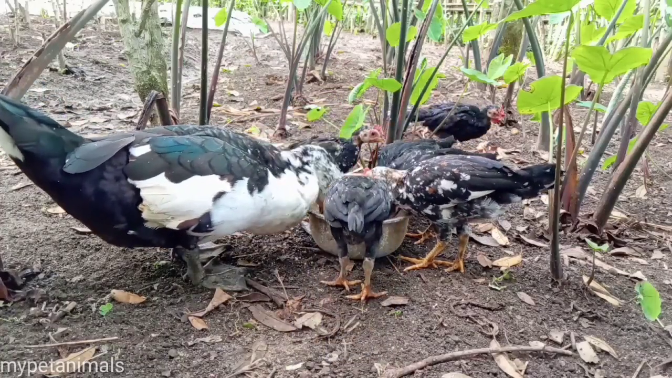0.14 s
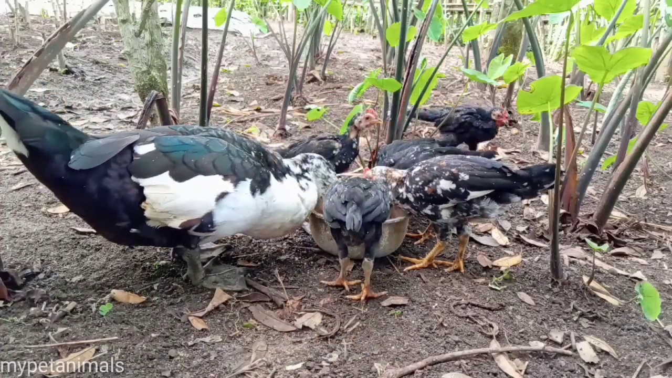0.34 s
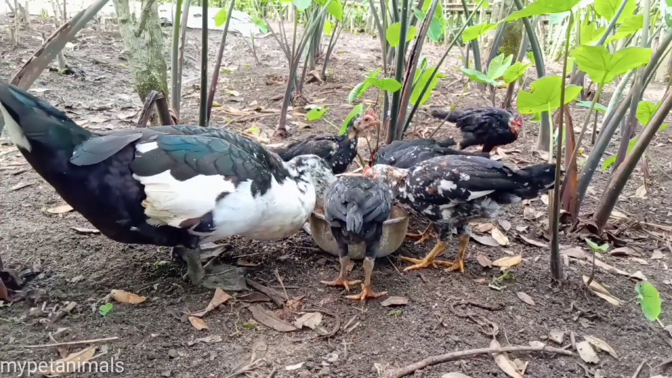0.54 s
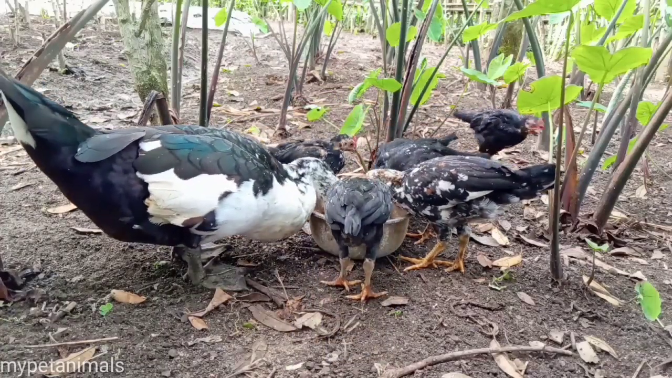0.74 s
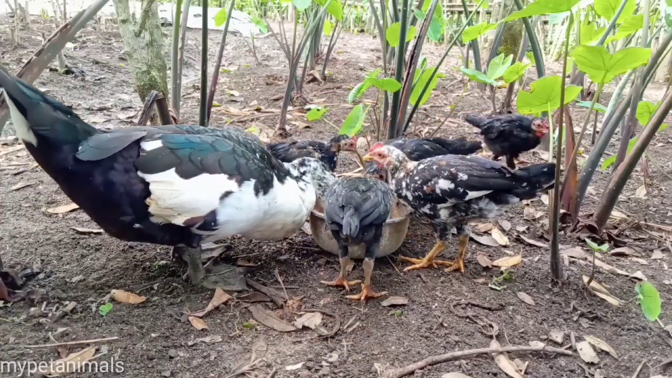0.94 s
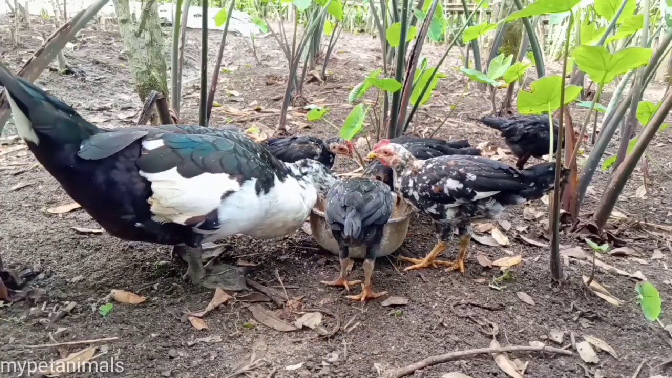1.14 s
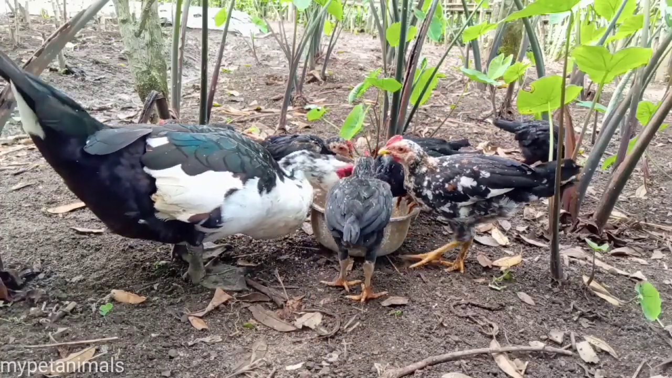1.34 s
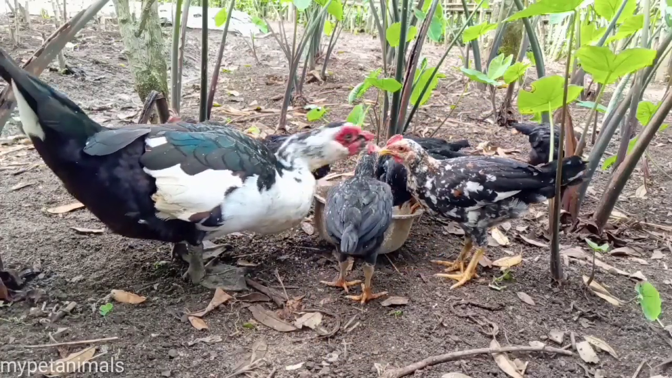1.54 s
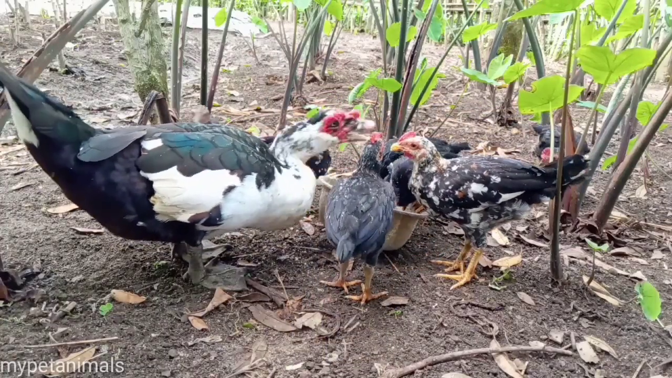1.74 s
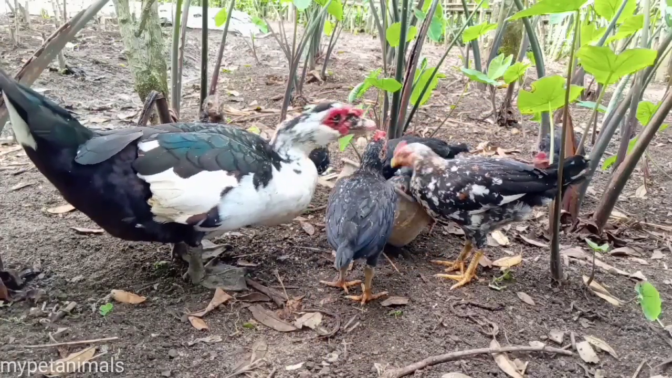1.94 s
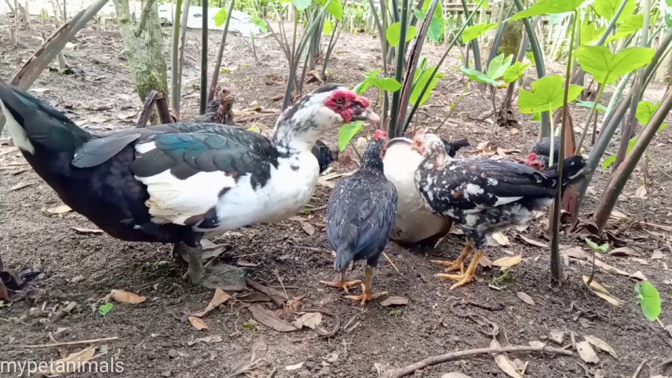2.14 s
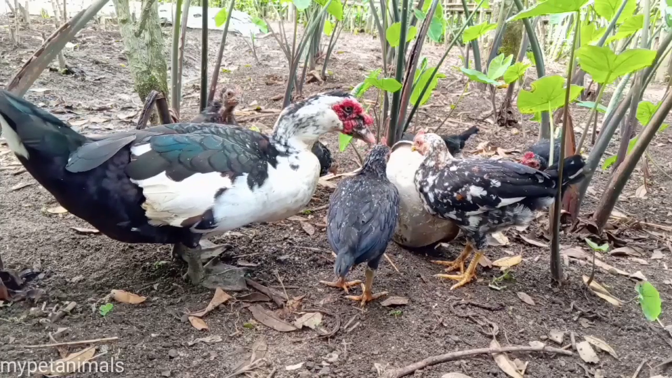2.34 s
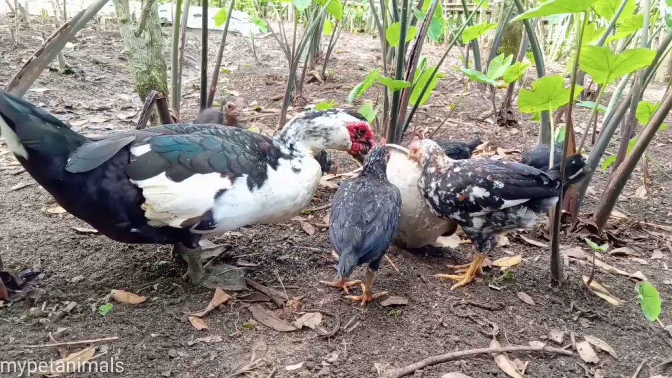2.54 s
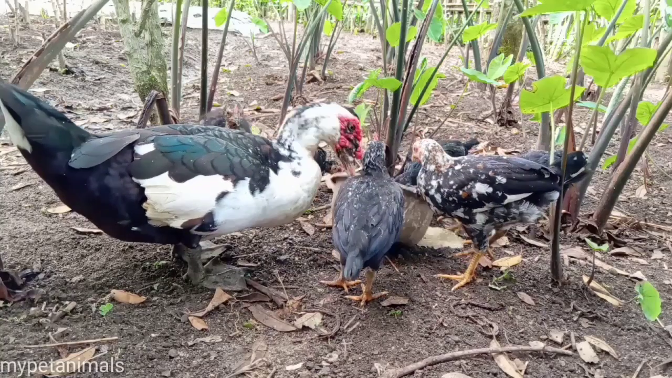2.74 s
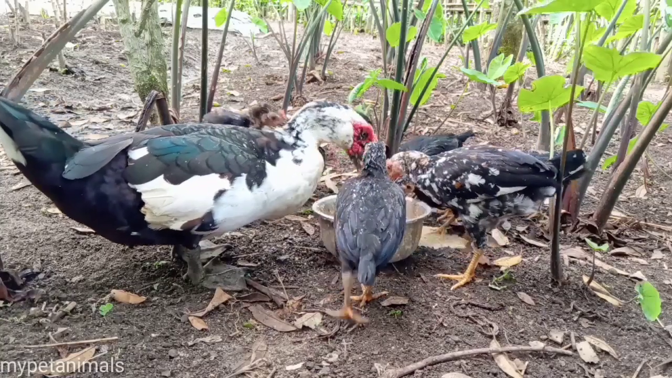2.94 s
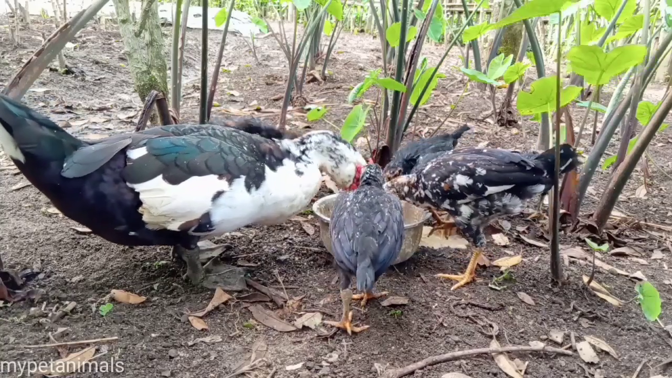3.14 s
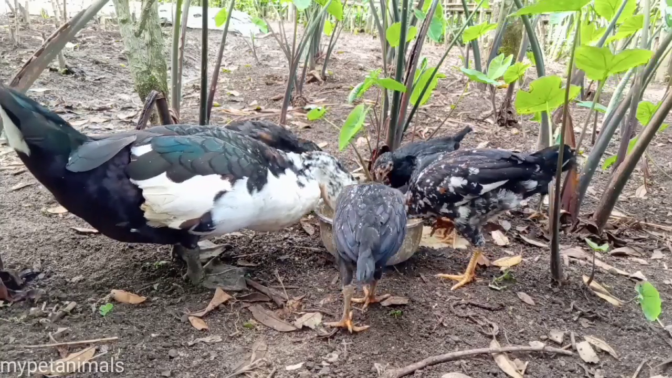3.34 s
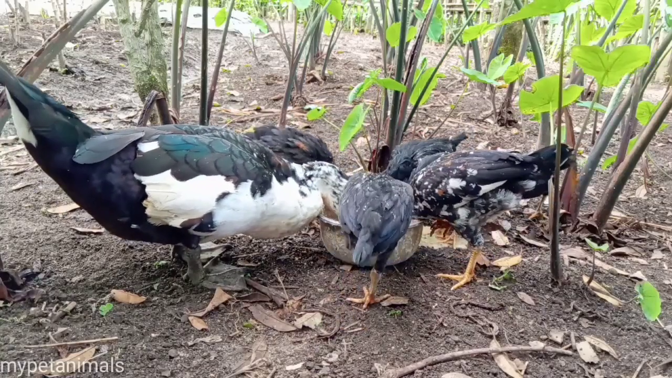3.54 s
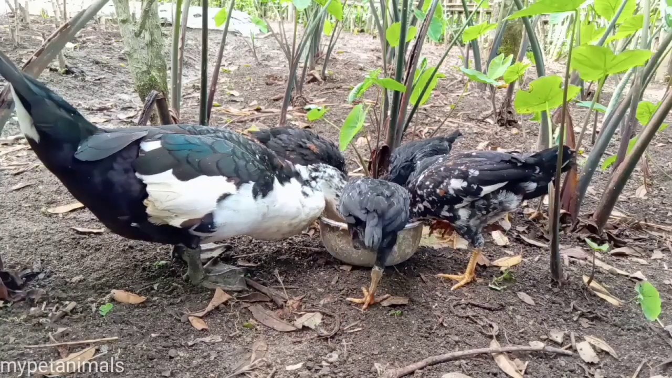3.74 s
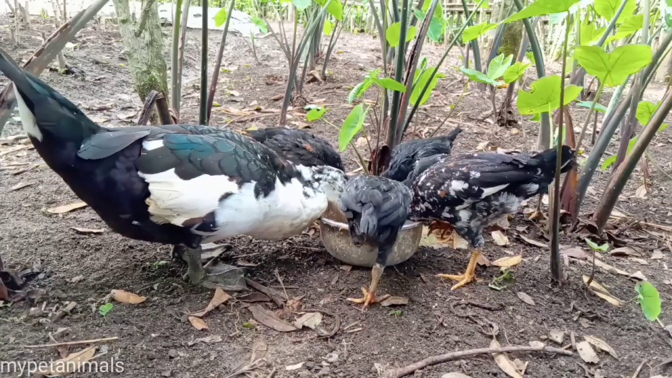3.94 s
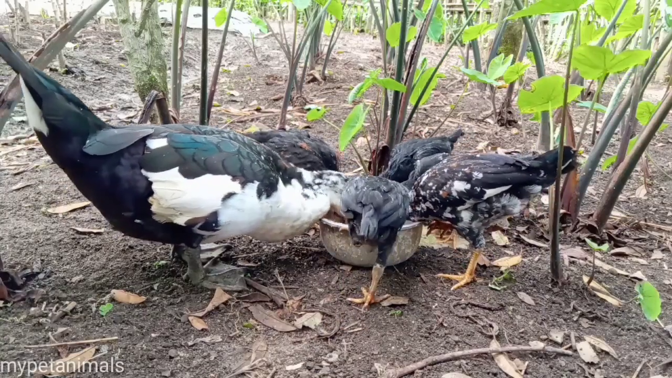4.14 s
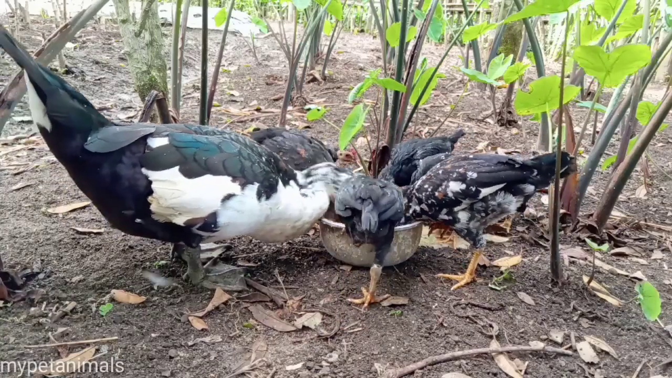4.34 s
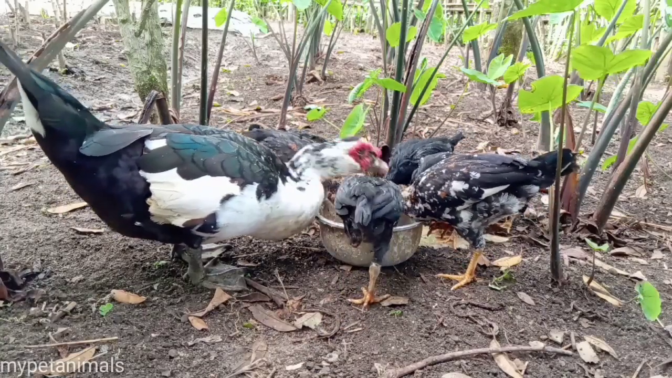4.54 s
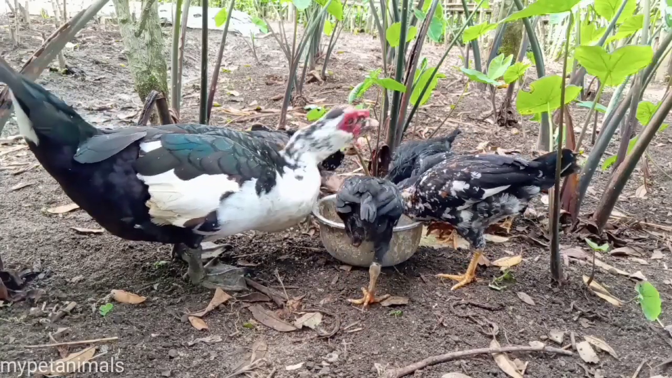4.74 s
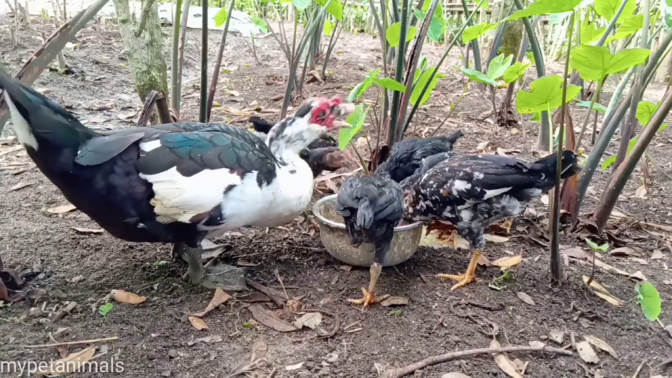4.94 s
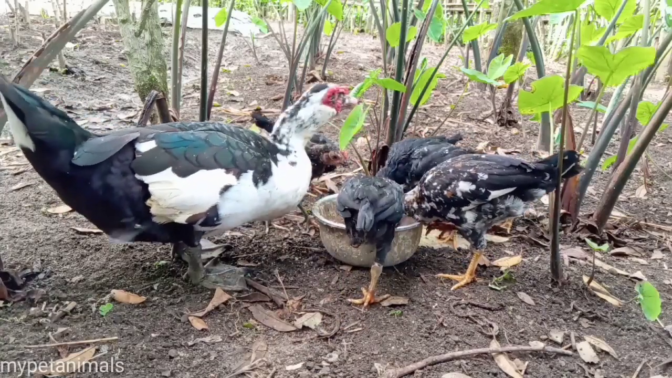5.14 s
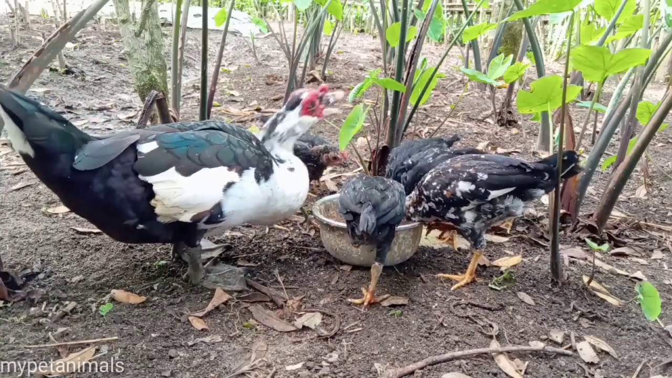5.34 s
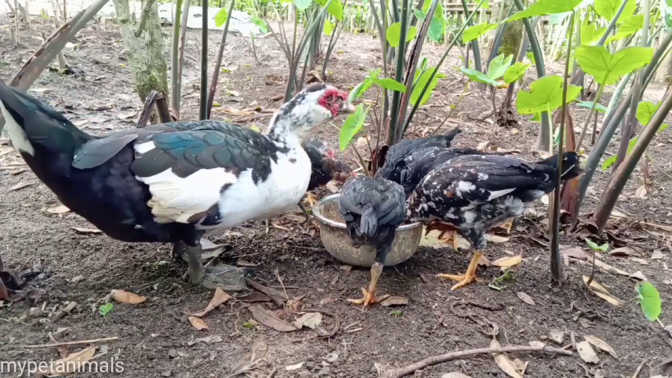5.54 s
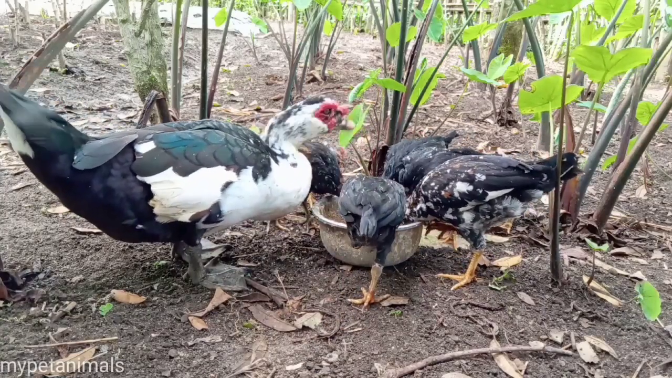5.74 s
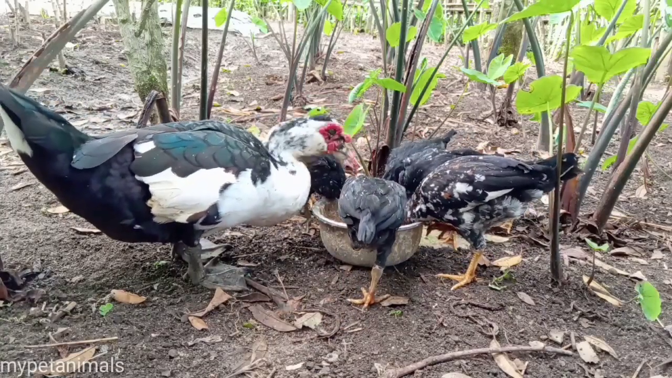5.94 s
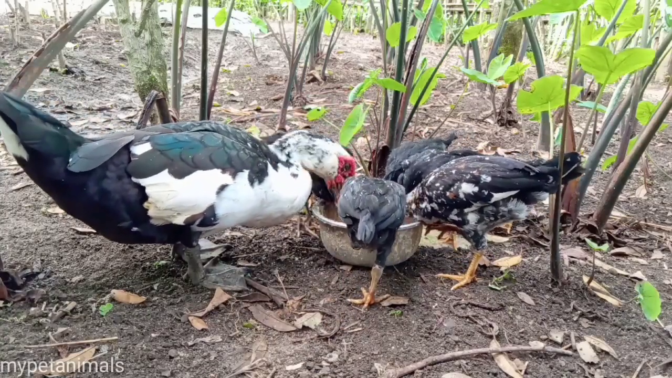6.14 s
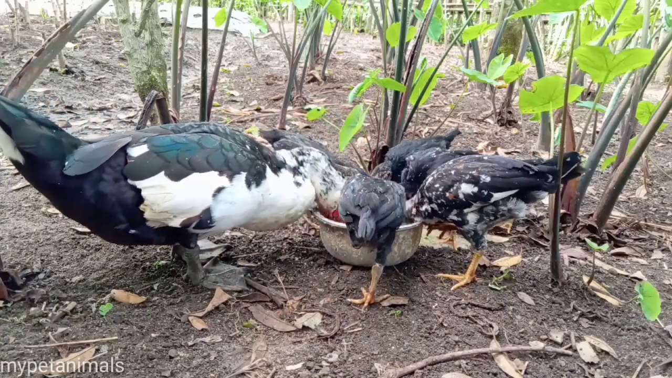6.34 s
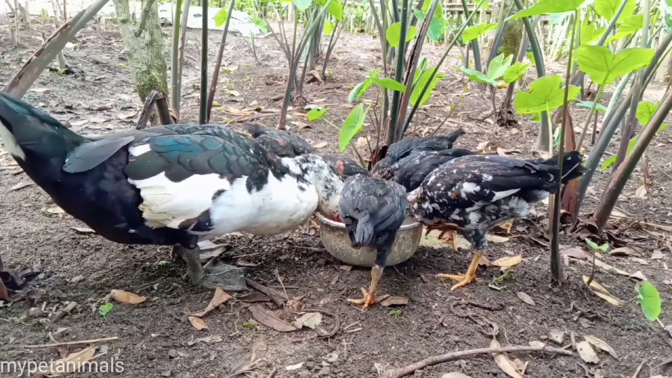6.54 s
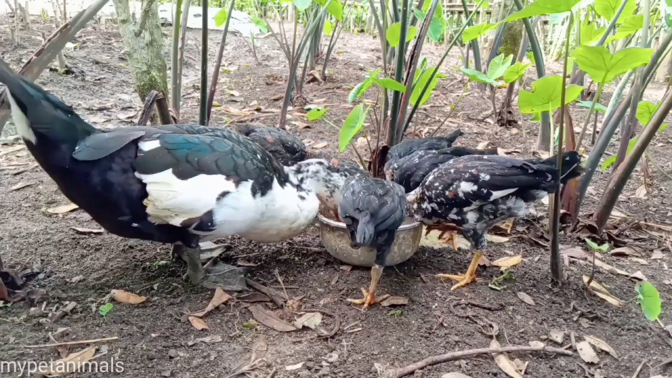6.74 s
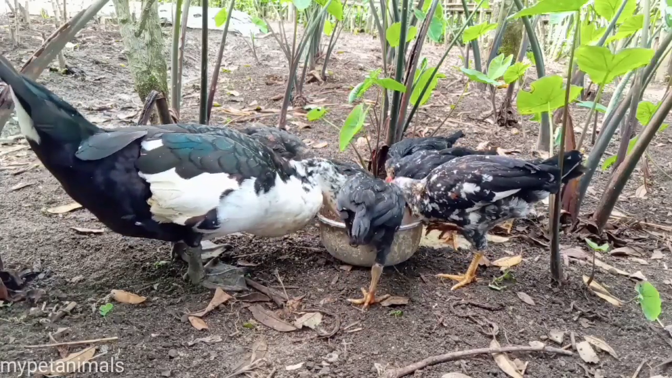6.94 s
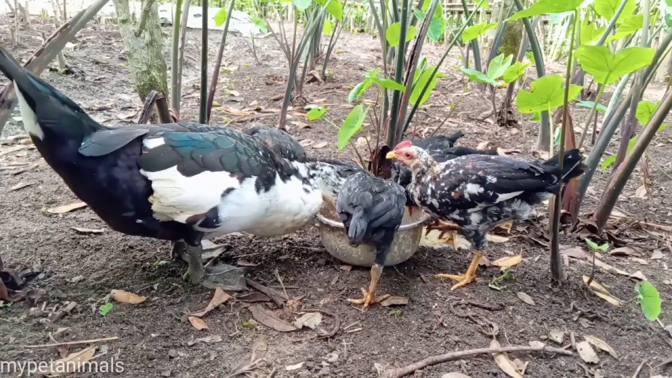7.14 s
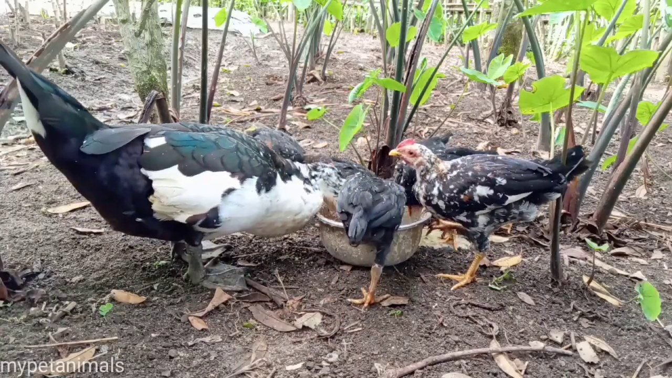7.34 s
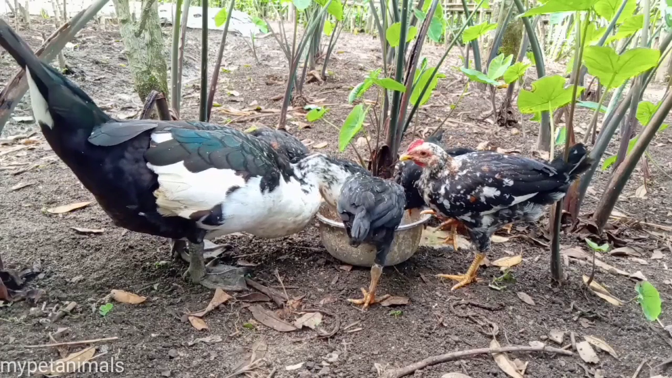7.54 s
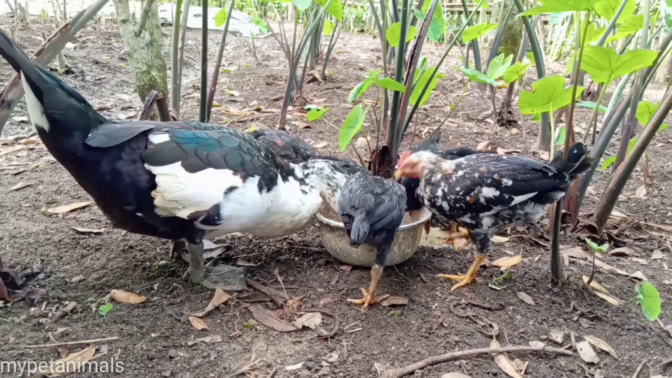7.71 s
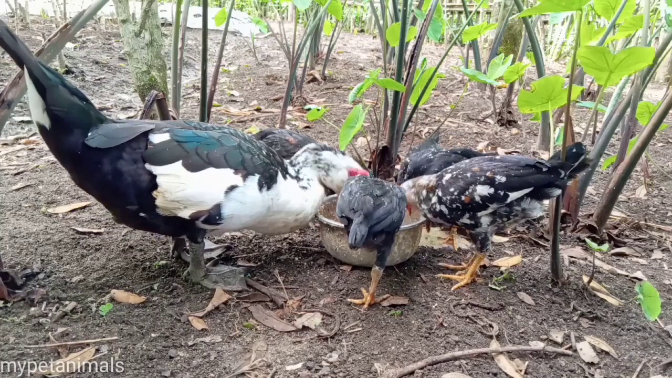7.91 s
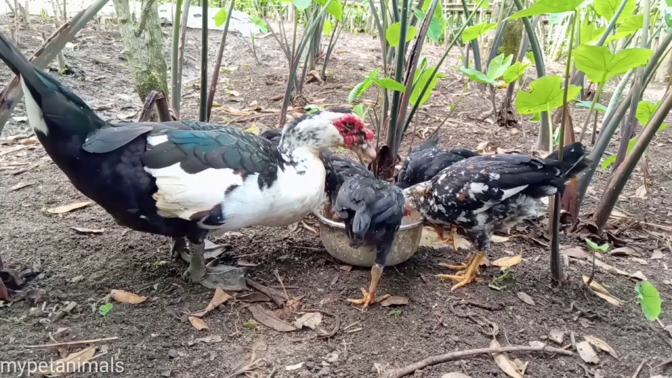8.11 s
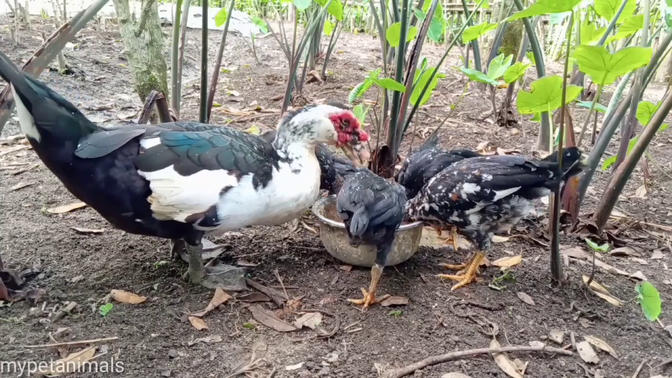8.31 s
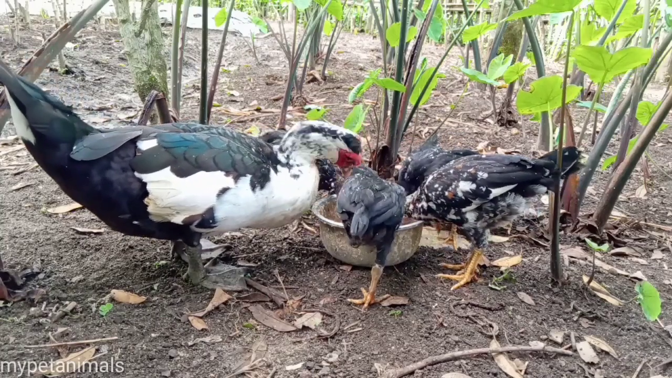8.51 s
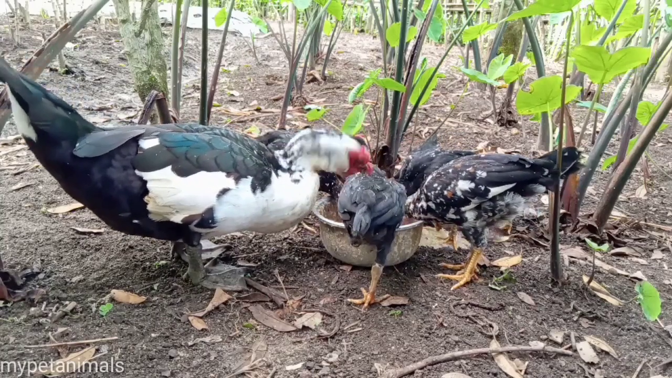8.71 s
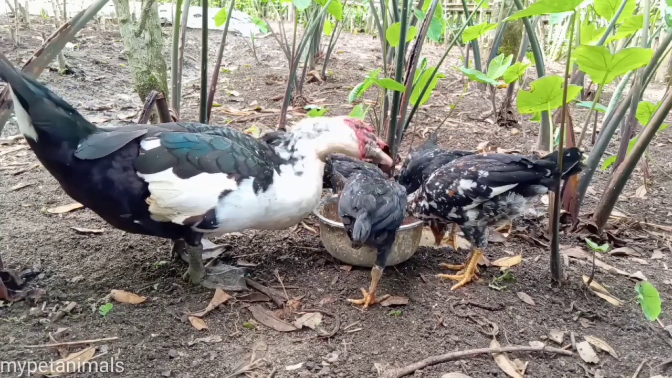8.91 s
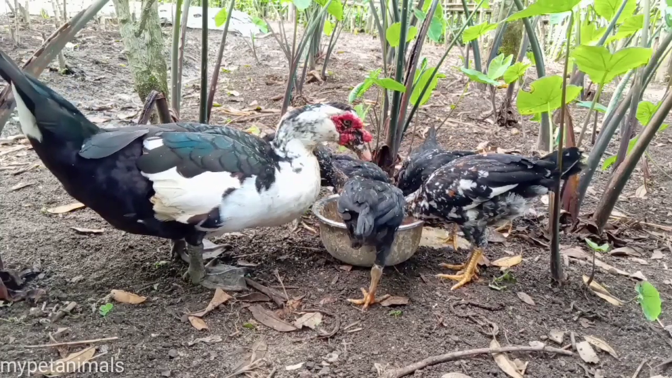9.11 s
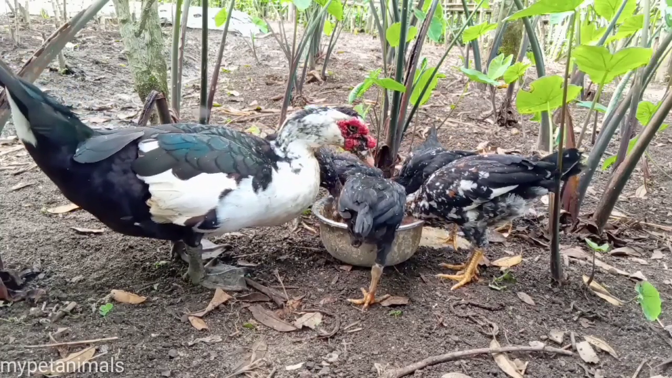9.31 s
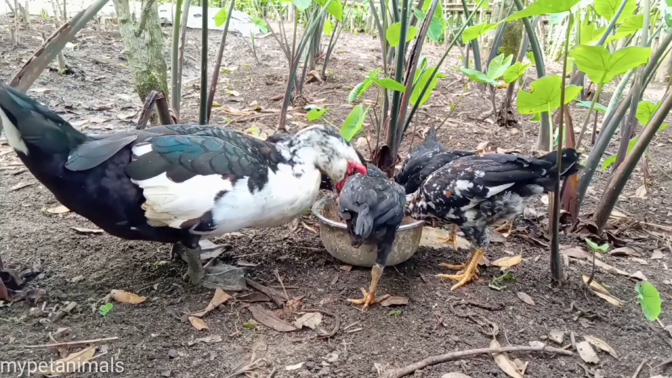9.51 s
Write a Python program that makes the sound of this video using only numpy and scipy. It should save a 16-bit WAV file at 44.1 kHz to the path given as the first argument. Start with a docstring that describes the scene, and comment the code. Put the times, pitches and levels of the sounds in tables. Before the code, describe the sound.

In a yard with a soft hiss and a distant motor hum, beaks tap and ring a metal feed bowl a short way from the microphone. Chicks peep and whine, then squabble shrilly while the bowl tips, grinds on the ground and lands with a sharp clank. The feeding settles into scattered cheeps, low clucks, tiny ticks and leaf rustles, with a brief bird sneeze near the end.

```python
"""A soft wash of yard noise and far motors, and almost at once chicks whining, clucking and cheeping.
Young chickens and a duck crowd round a metal feed bowl on bare ground, a couple of metres away.
Air forced through the syrinx, a bird's voice box, makes the calls, often on both its sides at once.
Beaks ring the bowl and crack feed, feet stir dry litter, the bowl tips and knocks back, a bird sneezes.
An expander turns quiet moments down, so the yard noise swells round each loud sound."""
import sys
import numpy as np
from scipy import signal
from scipy.fft import rfft, irfft, next_fast_len
from scipy.io import wavfile
from scipy.ndimage import uniform_filter1d, minimum_filter1d

SR = 44100
rng = np.random.default_rng(int(sys.argv[2]) if len(sys.argv) > 2 else 0)


def transcribe(u):
    """Save the signal u as a 16-bit wav file named by the first command-line argument.

    u: samples, shape (n,) or (channels, n), limited to [-1, 1]; the rate is SR.
    q: integer samples, one column per channel.
    """
    v = np.clip(np.atleast_2d(u).T, -1, 1)
    q = np.round(v * 32767).astype(np.int16)
    wavfile.write(sys.argv[1], SR, q)


N = 422037
TIME = np.arange(N) / SR
TOP_HZ = 15700  # the treble ends here


def undb(db):
    """Turn decibels into a number to multiply a sound by."""
    return 10 ** (np.asarray(db) / 20)


def unit(x):
    """Scale a sound to an average strength (rms) of 1."""
    return x / np.sqrt(np.mean(x ** 2) + 1e-18)


def clock(length):
    """The time of each sample over a length in seconds."""
    return np.arange(max(int(length * SR), 32)) / SR


def add(out, start, x):
    """Mix x into out from a start time in seconds."""
    i = int(np.clip(start * SR, 0, N - 1))
    out[i:i + len(x)] += x[:N - i]


def noise(t):
    """Fresh white noise, an even hiss, for the times t."""
    return np.random.default_rng(rng.integers(2 ** 31)).standard_normal(len(t))


def wander(t, rate):
    """A random wobble, about 1 in size, that picks a new value rate times a second."""
    return 1.2 * np.interp(t * rate, np.arange(len(t)), noise(t))


def colour(x, points):
    """Shape the bass and treble of x along points of (frequency [Hz], level [dB])."""
    hz, db = np.transpose(points)
    size = next_fast_len(len(x))
    bin_hz = np.fft.rfftfreq(size, 1 / SR) + 1
    gain = undb(np.interp(np.log(bin_hz), np.log(hz), db))
    return irfft(rfft(x, size) * gain, size)[:len(x)]


def band(x, hz, width_hz):
    """A resonance: let through the part of x near one frequency."""
    hz = min(hz, .45 * SR)
    return signal.lfilter(*signal.iirpeak(hz, hz / min(width_hz, SR / 4), fs=SR), x)


# the tone colour of the outdoor noise: (frequency [Hz], level [dB])
YARD_COLOUR = [(20, -52), (53, -19), (75, -1), (190, -8), (457, -16), (782, -16.5), (945, -20), (4040, -21),
               (6050, -22.5), (15500, -34)]
# the background dips after the loud cheeps, as the recorder's gain drops, then slowly recovers:
# (time [s], level [dB])
BACKGROUND_LEVEL = [(0, -34.5), (1.3, -38), (2.9, -36), (3.3, -44.5), (4.4, -43), (5.8, -40.5),
                    (9.5, -37.5)]
def yard(hiss_hz=6040, width_hz=440, hiss_db=-10.5):
    """Distant outdoor noise with a thin high hiss."""
    air = unit(colour(noise(TIME), YARD_COLOUR)) * undb(wander(TIME, 14) - 1.5)
    hiss = band(noise(TIME), hiss_hz, width_hz)
    hiss = undb(hiss_db) * unit(band(hiss, hiss_hz, width_hz))
    return (air + hiss) * undb(np.interp(TIME, *np.transpose(BACKGROUND_LEVEL)))


# motor hums: (time [s], length [s], first pitch [Hz], last pitch [Hz], level [dB])
MOTOR_HUMS = [(0, 9.57, 78.5, 70.02, -46), (0, 2.2, 285.5, 284.7, -45.5), (2.25, 2.98, 270, 270.2, -53.5),
              (4.8, 4.9, 214, 214.5, -59)]
def motors(fade_s=.13):
    """Far motors come and go, each a low tone that holds or slowly sinks."""
    out = np.zeros(N)
    for start, length, from_hz, to_hz, db in MOTOR_HUMS:
        t = clock(length)
        hz = np.linspace(from_hz, to_hz, len(t)) + wander(t, 10) / 2
        tone = unit(np.sin(2 * np.pi * np.cumsum(hz) / SR))
        fades = np.clip(np.minimum(t, t[-1] - t) / fade_s, 0, 1)
        add(out, start, tone * fades * undb(db + 2 * wander(t, 13)))
    return out


# how well a chick's throat passes overtones and breath: (frequency [Hz], level [dB])
THROAT_COLOUR = [(2000, -3.5), (3000, -3.5), (3900, -19), (4700, -10), (5900, -23.5), (7100, -11.5),
                 (8200, -20), (9300, -25.5), (10500, -18), (15000, -39)]
def voice(contour, jitter, overtone_db, flutter_db=3, rasp_db=-21, air_db=-32, drift=.00754):
    """One side of the syrinx whistles along rows of (time [s], pitch [Hz], level [dB])."""
    times, pitch, db = np.transpose(contour)
    times = np.maximum.accumulate(times) - times[0]
    t = clock(times[-1])
    # jitter shakes the pitch quickly, drift bends it slowly
    hz = np.interp(t, times, pitch) * (1 + jitter * wander(t, 798) + drift * wander(t, 25))
    phase = 2 * np.pi * np.cumsum(hz) / SR
    overtones = np.zeros(len(t))  # tones at 2, 3 and 4 times the pitch
    for k in range(2, 5):
        throat_gain = undb(np.interp(k * hz, *np.transpose(THROAT_COLOUR)))
        overtones += throat_gain * (k * hz < TOP_HZ) * np.sin(k * phase) * 2 / k
    # strong and weak vibrations take turns now and then, adding a faint tone at half the pitch
    uneven = 1 + undb(-34) * 2 * np.sin(phase / 2) * wander(t, 20)
    tone = unit(uneven * np.sin(phase) + undb(overtone_db) * overtones)
    # air forced past the vibrating membrane roughens the tone and hisses through the open beak
    rasp = 1 + undb(rasp_db) * wander(t, 2500)
    breath = undb(air_db) * unit(colour(noise(t), THROAT_COLOUR) + noise(t) / 10)
    fades = np.clip(np.minimum(t, t[-1] - t) / .0028, 0, 1)
    loudness = undb(np.interp(t, times, db) + flutter_db * wander(t, 220))
    return (tone * rasp + breath) * fades * loudness


def arch(share, peak_share, swell_db, fade_db):
    """A call swells to 0 dB, then fades, as share runs from 0 (its start) to 1 (its end)."""
    return np.interp(share, [0, np.clip(peak_share, .05, .95), 1], [-swell_db, 0, -fade_db])


def slide(start, length, from_hz, to_hz, db, settle_share=.3):
    """The path of a whine: loudest early, it fades while the pitch relaxes towards a held note."""
    share = np.linspace(0, 1, 24)
    hz = to_hz + (from_hz - to_hz) * np.exp(-share / settle_share)
    level_db = db + arch(share, peak_share=.19, swell_db=8, fade_db=9)
    return np.transpose([start + share * length, hz, level_db])


# three kinds of sliding note: (time [s], length [s], first pitch [Hz], held pitch [Hz], level [dB])
THIN_WHINES = [(0.069, 0.12, 4400, 3017, -24.5), (0.184, 0.028, 3114, 4050, -31),
               (0.203, 0.099, 4100, 3530, -32.5), (0.901, 0.028, 4600, 3950, -31),
               (1.003, 0.049, 4900, 2950, -31), (3.092, 0.062, 4540, 4060, -37),
               (3.71, 0.14, 2405, 2790, -42), (4.089, 0.18, 4654, 3677, -28.5),
               (7.269, 0.04, 4170, 3550, -41.5), (7.299, 0.045, 2890, 2510, -34.5),
               (8.036, 0.1, 4390, 3080, -37.5)]
RISING_WHIMPER = [(6.38, 0.11, 2205, 3360, -35), (6.55, .177, 2440, 2734, -36.5)]
FAR_FOWL = (9.21, .4, 810, 765, -43)
def whines():
    """Thin drawn-out notes, a hoarse rising whimper and one sagging call from a far fowl."""
    out = np.zeros(N)
    for call in THIN_WHINES:
        add(out, call[0], voice(slide(*call), jitter=.014, overtone_db=0))
    for call in RISING_WHIMPER:
        add(out, call[0], voice(slide(*call), jitter=.06, overtone_db=-17, rasp_db=-14))
    far_call = voice(slide(*FAR_FOWL), jitter=.02, overtone_db=2)
    add(out, FAR_FOWL[0], band(far_call, hz=1120, width_hz=900))
    return out


# soft low clucks: (time [s], length [s], pitch [Hz], level [dB])
SOFT_CLUCKS = [(0.095, 0.079, 410, -32.5), (1.589, 0.046, 365, -38.5), (3.09, 0.029, 433, -37),
               (6.012, 0.021, 441, -36.5), (6.632, 0.0325, 448, -40.5), (8.665, 0.041, 408, -33.5)]
def clucks(sag=.89):
    """Short notes, made with the beak closed, that sink a little."""
    out = np.zeros(N)
    for start, length, hz, db in SOFT_CLUCKS:
        contour = [(start, hz / sag, db - 9.5),
                   (start + length / 3, hz, db),
                   (start + length, hz * sag, db - 2)]
        add(out, start, voice(contour, jitter=.033, overtone_db=-7.5))
    return out


def fall(start, length, from_hz, to_hz, bow, scoop, db, peak_share, scoop_s=.018, swell_db_per_s=400):
    """The path of a cheep: the pitch may scoop up into the note, then falls as the membrane slackens."""
    share = np.linspace(0, 1, 24)
    falling_hz = from_hz + (to_hz - from_hz) * share ** bow
    scoop_up = 1 - scoop * np.maximum(1 - share * length / scoop_s, 0)
    level_db = db + arch(share, peak_share, swell_db_per_s * peak_share * length, fade_db=10)
    return np.transpose([start + share * length, falling_hz * scoop_up, level_db])


# falling cheeps: (time [s], length [s], top pitch [Hz], last pitch [Hz], bow [1 straight, more drops
# later], scoop [0-1], level [dB], loudest point [0-1 of the length], roughness [0-1], overtones [dB])
# Rows that overlap are two voices at once; back-to-back rows are a voice breaking to a lower note.
FALLING_CHEEPS = [ (0.103, 0.046, 3360, 2230, 1.16, 0.07, -23.5, 0.82, 0.8, -6),
                  (0.915, 0.065, 3800, 2153, 1.49, 0.02, -14.5, 0.47, 0.77, 0.5),
                  (2.128, 0.044, 3510, 2100, 1.22, 0, -20.5, 0.71, 0.94, 3),
                  (2.755, 0.074, 3040, 1855, 3.3, 0.17, -15.5, 0.62, 0.56, -4),
                  (2.867, 0.048, 3700, 2704, 0.79, 0, -4, 0.46, 0.61, -6),
                  (2.905, .057, 3720, 2956, 1.53, 0.03, -4, .88, 0.68, 5.5),
                  (2.908, 0.05, 3203, 2215, 1.1, 0, -17.5, 0.57, 0.8, -6),
                  (2.96, .022, 2904, 2477, .5, 0.01, -14, .55, .8, -10),
                  (3.118, 0.056, 3806, 2525, 2.2, 0, -19.5, 0.37, 0.4, 5.5),
                  (3.148, 0.081, 3980, 2986, 1.02, 0, -17.5, 0.48, 0.78, -1.5),
                  (3.22, 0.024, 2700, 2070, 0.69, 0, -29, .3, 0.8, -6),
                  (4.093, 0.056, 3130, 2010, 2.7, 0, -30, 0.41, 0.6, 5),
                  (4.297, .064, 3730, 2440, 1.7, 0.4, -18, 0.72, 0.6, 1),
                  (7.337, 0.029, 3110, 2047, 1.1, 0, -24, 0.82, 0.9, 1),
                  (7.364, 0.035, 1672, 847, .8, 0, -21, 0.8, 0.87, 2),
                  (7.537, 0.039, 3530, 2990, 3.6, 0.01, -17.5, 0.89, 0.2, 3),
                  (7.575, 0.025, 2730, 2100, 0.55, 0, -19, .55, 0.86, -1),
                  (8.098, 0.018, 3290, 2030, 0.84, 0.02, -19.5, 0.58, .5, -0.5),
                  (8.566, 0.074, 3950, 2847, 1.45, 0.24, -6.5, 0.73, 0.23, -2.5), ]
def cheeps():
    """The loud calls of squabbling chicks; the rough ones shake in pitch and level, rasp and hiss."""
    out = np.zeros(N)
    for *call, rough, overtone_db in FALLING_CHEEPS:
        rough_db = 20 * np.log10(np.clip(rough, .1, 1))
        cheep = voice(fall(*call), jitter=.027 * rough, overtone_db=overtone_db,
                      flutter_db=4 * rough, rasp_db=rough_db - 20, air_db=rough_db - 33)
        add(out, call[0], cheep)
    return out


# the tones the metal bowl rings with: (pitch [Hz], level [dB], time to fade by 60 dB [s])
BOWL_TONES = [(324, -2.5, 0.27), (537, -7, .25), (740, -4.5, 0.1), (797, -3.5, 0.1), (932, -8.5, .1),
              (1560, -7.5, 0.15), (1672, -7.5, 0.059), (2060, -4.5, .14), (7070, -2, 0.1), (7440, -2, .11),
              (7640, 2, 0.09), (7900, -2, .1), (9023, -9, 0.11), (10760, -5, 0.024)]
# the tone colour of a hit's crack and tail: (frequency [Hz], level [dB])
CRACK_COLOUR = [(150, 6.5), (800, -10), (2000, -10), (4000, -22.5), (6000, -17), (7500, 0), (9500, -8),
                (15500, -25)]
def blow(contact_hz, crack_db=10, crack_s=.021, tail_db=-3, tail_s=.1, detune=.006):
    """One hit on the bowl: ringing tones, a crack and a noisy tail; harder contact sounds brighter."""
    t = clock(.3)
    ring = np.zeros(len(t))
    for hz, db, fade_s in BOWL_TONES:
        pitch = hz * (1 + detune * rng.uniform(-1.1, 1))
        ring += undb(db - 60 * t / fade_s) * np.sin(2 * np.pi * pitch * t) * rng.choice([-1, 1])
    clatter = unit(colour(noise(t), CRACK_COLOUR))
    clatter *= undb(crack_db - 60 * t / crack_s) + undb(tail_db - 60 * t / tail_s)
    hit = band(ring / 2 + clatter, contact_hz, width_hz=.44 * contact_hz)
    return hit / np.abs(hit).max()


# hits on the bowl: (time [s], peak level [dB], favoured frequency [Hz])
BOWL_HITS = [(0.179, -15, 1240), (0.1845, -0.5, 8050), (0.258, -18.5, 7500), (0.485, -28, 602),
             (0.6873, -14, 10800), (.822, -24.5, 9000), (0.9799, -17, 8000), (1.6691, -25, 11020),
             (2.021, -20, 674), (2.338, -20.5, 4900), (2.642, -23, 499), (2.7317, -11, 674),
             (2.876, -15.5, 1000), (3.0276, 5.5, 7300), (3.029, -14, 1700), (3.797, -27, 910),
             (3.955, -28, 830), (4.1744, -21.5, 9000), (4.193, -20.5, 3940), (5.227, -21.5, 1100),
             (5.67, -29, 1388), (7.025, -30, 650), (8.822, -21, 1690), (8.845, -28, 3160),
             (8.972, -28, 2400)]
def bowl():
    """Beak tips strike the bowl (high sounds), and the bowl knocks on the ground (low sounds)."""
    out = np.zeros(N)
    for start, db, contact_hz in BOWL_HITS:
        add(out, start, undb(db) * blow(contact_hz))
    return out


# each chick's peep, lower voice then upper: (point [0-1 of the length], pitch [Hz], level [dB])
MELLOW_VOICES = [
    [(0, 2350, -18.5), (.2, 2930, -8), (.42, 2950, -3.5), (.65, 2830, -3.5), (1, 2480, -17)],
    [(.1, 3420, -19), (.3, 3510, -9), (.65, 3050, -4), (1, 2400, -13)],
]
SHRILL_VOICES = [
    [(0, 3502, -15), (.22, 3728, -8.5), (.6, 3424, -7), (1, 2950, -12)],
    [(.15, 5735, -21.5), (.45, 4400, -11), (.66, 3490, 1), (1, 2880, -12)],
]
# when each chick peeps: (time [s], length [s], level [dB])
MELLOW_TIMES = [(.568, .088, -31), (.778, 0.099, -30.5), (1.637, 0.098, -31), (1.872, 0.096, -22.5),
                (2.528, 0.091, -29), (2.685, .1, -29), (3.372, 0.12, -35), (3.54, .115, -35)]
SHRILL_TIMES = [(4.538, 0.085, -38), (4.696, 0.079, -35.5), (4.888, 0.096, -30.5), (5.094, .089, -24),
                (5.98, 0.11, -29)]
def peeps(detune=.015):
    """Two chicks repeat their peeps, never quite in tune; each one's two voices close in and throb."""
    out = np.zeros(N)
    for rows, voices in [(MELLOW_TIMES, MELLOW_VOICES), (SHRILL_TIMES, SHRILL_VOICES)]:
        for start, length, level_db in rows:
            for shape in voices:
                tuning = 1 + detune * rng.uniform(-1, 1)
                contour = [(start + share * length, hz * tuning, level_db + db)
                           for share, hz, db in shape]
                add(out, contour[0][0], voice(contour, jitter=.013, overtone_db=-6.5, drift=.01))
    return out


def tick(hardness, fade_s=.014):
    """A tiny dry snap, brighter for a harder grain."""
    t = clock(.05)
    return band(noise(t) * undb(-60 * t / fade_s), hz=4000 + 10000 * hardness, width_hz=5600)


# clear snaps of a beak on feed: (time [s], peak level [dB])
BEAK_SNAPS = [(.5907, -25), (.901, -22), (1.061, -23), (5.5002, -25), (7.526, -25), (8.811, -29),
              (8.885, -25)]
def crumbs(faint_count=120):
    """Beaks snap shut and grains of feed crack: a few clear ticks among many faint, random ones."""
    out = np.zeros(N)
    for start, db in BEAK_SNAPS:
        snap = tick(hardness=.27)
        add(out, start, undb(db) * snap / np.abs(snap).max())
    for when, size, hardness in rng.random((faint_count, 3)):
        db = -38 - 4.5 * np.log(1 - .95 * size)
        add(out, when * N / SR, tick(hardness) * undb(db))
    return out


# flurries of rustling: (time [s], length [s], level [dB])
LITTER_RUSTLES = [(1.851, 0.49, -40.5), (2.5, 0.63, -35.5), (3.573, 0.17, -37.5), (4.074, 0.37, -38),
                  (4.679, 0.91, -45.5), (6.502, 0.83, -45), (8.35, 1, -45.5)]
def litter(grain_db=2.5, flurry_db=1.9):
    """Dry leaves and feed crackle as feet and beaks stir them."""
    out = np.zeros(N)
    for start, length, db in LITTER_RUSTLES:
        t = clock(length)
        grains = noise(t) * undb(grain_db * wander(t, 980) + flurry_db * wander(t, 35))
        crackle = colour(grains, [(300, -6), (1500, -11), (5000, -15),
                                  (7400, 0), (10000, -15), (15000, -12)])
        add(out, start, unit(crackle) * undb(db) * np.sin(np.pi * t / t[-1]))
    return out


# the tone colour of the bowl on soil: (frequency [Hz], level [dB])
SCRAPE_COLOUR = [(40, -17), (85, 0.5), (200, -9), (880, -14.5), (2000, -31.5)]
def scrape(start=2.76, length=.28, db=-32, judder_db=4.5):
    """The tipped bowl grinds and rocks on the soil: uneven low thuds with a rasp from its rim."""
    out, t = np.zeros(N), clock(length)
    contact = noise(t) * undb(judder_db * wander(t, 90))
    swell = np.sqrt(np.abs(np.sin(np.pi * t / t[-1])))
    add(out, start, undb(db) * unit(colour(contact, SCRAPE_COLOUR)) * swell)
    return out


# the tone colour of a sneeze: (frequency [Hz], level [dB])
SNEEZE_COLOUR = [(100, -11), (520, -8), (690, 5.5), (790, 5), (1000, -11.5), (1450, -7), (1900, -17),
                 (2800, -8.5), (6900, -6), (8800, -13), (14000, -21), (16000, -31)]
def sneeze(start=7.797, length=.11, db=-20):
    """A bird blows feed from its nostrils: a fluttering burst of air, shaped by the throat."""
    out, t = np.zeros(N), clock(length)
    swell_db = np.interp(t / t[-1], [0, 1 / 4, 1 / 2, 1], [-23, -7, 0, -23])
    air = unit(colour(noise(t), SNEEZE_COLOUR))
    add(out, start, air * undb(db + swell_db + 2 * wander(t, 409)))
    return out


def echoes(x, near_db=-9, near_fade_s=.1, far_db=-27, far_fade_s=.35):
    """Ground, stems and leaves scatter a strong short echo; the trees beyond add a faint long one."""
    t = clock(.4)
    near = unit(noise(t) * undb(-60 * t / near_fade_s) * (t > .002))
    far = unit(noise(t) * undb(-60 * t / far_fade_s) * (t > .02))
    echo = (undb(near_db) * near + undb(far_db) * far) / np.sqrt(len(t))
    return x + signal.fftconvolve(x, echo)[:N]


def scene():
    """Birds and bowl echo among the plants, over the yard noise and motors."""
    birds = cheeps() + whines() + peeps() + clucks() + sneeze()
    nearby = birds + bowl() + scrape() + litter() + crumbs()
    return (echoes(nearby) + yard() + motors())[None]


def record(dry, cut_db=-9, shut_db=-36, open_db=-20, window_s=.05):
    """An expander turns quiet stretches down, a fast limiter holds peaks back, the top treble is cut."""
    power = uniform_filter1d(dry ** 2, int(window_s * SR), axis=-1)
    level_db = 10 * np.log10(np.abs(power) + 1e-12)
    opening = np.clip((level_db - shut_db) / (open_db - shut_db), 0, 1)
    expanded = dry * undb(cut_db * (1 - opening))
    safe_gain = minimum_filter1d(1 / np.maximum(np.abs(expanded), 1), size=61, axis=-1)
    limited = expanded * uniform_filter1d(safe_gain, size=61, axis=-1)
    return signal.sosfilt(signal.ellip(10, .2, 70, TOP_HZ, fs=SR, output="sos"), limited)


dry = scene()
out = record(dry)
transcribe(out)
```